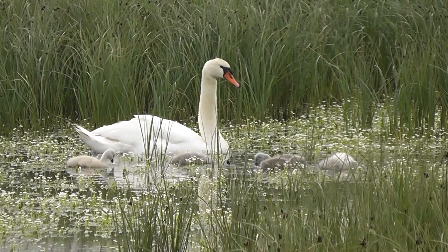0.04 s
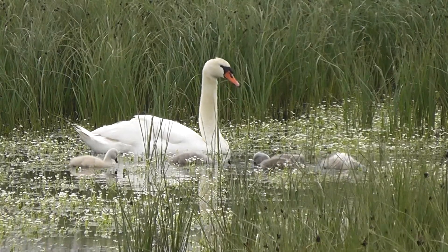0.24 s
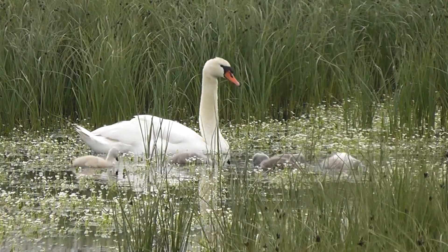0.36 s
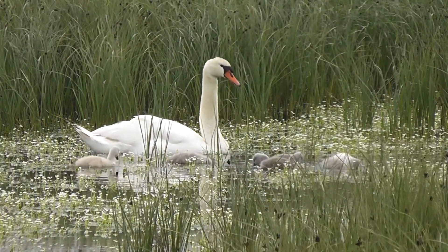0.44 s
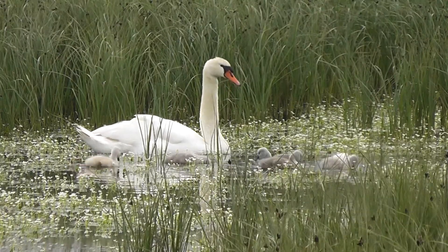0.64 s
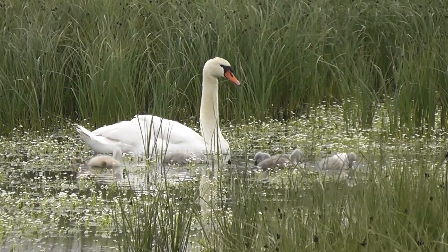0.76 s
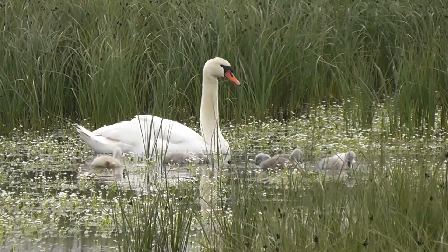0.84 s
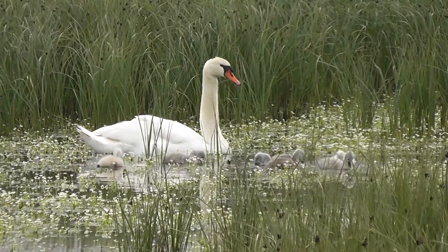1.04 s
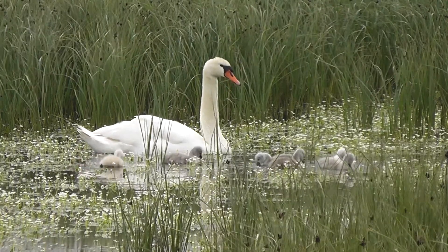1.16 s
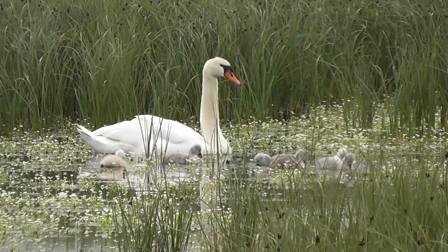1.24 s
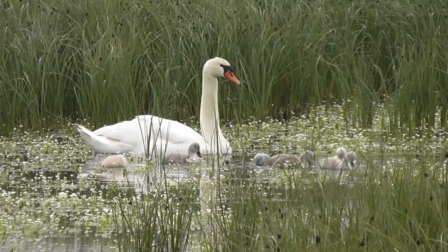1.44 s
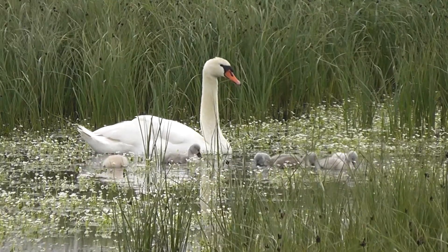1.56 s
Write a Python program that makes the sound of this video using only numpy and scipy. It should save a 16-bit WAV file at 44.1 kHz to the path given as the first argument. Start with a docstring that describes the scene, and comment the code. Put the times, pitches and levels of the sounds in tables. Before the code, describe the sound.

Waterfowl call at a reedy pond over a low, steady wind. Loud, dull microphone handling thumps come first, around 0.2 to 0.3 seconds. Three short rasping quacks follow at about 0.3, 0.45 and 0.6 seconds, with a brief clear honk at 0.5. A softer bump lands near 0.9, and a second honk at 1.3. Faint, thin hoots sound farther off, and the calls echo softly.

```python
"""A low rush of wind and a faint far hoot open the scene at a reedy pond. The camera is handled twice:
impacts excite damped thumps in its body while the grip rubs on it. One waterfowl gives three short,
rasping quacks, pulse trains filtered by the resonances of its throat; another gives two brief, clear
honks, harmonic tones that break out of a squeak. Thin hoots come from farther off, and the reedy banks
scatter every call into a soft echo."""
import sys
import numpy as np
from scipy import signal
from scipy.fft import rfft, irfft, next_fast_len
from scipy.io import wavfile
from scipy.ndimage import map_coordinates

SR = 44100
rng = np.random.default_rng(int(sys.argv[2]) if len(sys.argv) > 2 else 0)


def put_to_file(sound):
    """Save the sound as 16-bit audio at rate SR, in the file named by the first command-line argument."""
    columns = np.atleast_2d(sound).T  # one column per channel
    safe = np.clip(columns, -1, 1)
    whole_steps = np.round(safe * 32767)
    wavfile.write(sys.argv[1], SR, whole_steps.astype(np.int16))


N = 70560

# Spectra of the wind's rush and of its rumble on the microphone: frequency_hz, relative_db
WIND_SPECTRUM = [(12, -53.5), (20, -35), (49, -2), (106, -3), (153, -2), (208, -10.5), (260, -5), (334, -4),
                 (583, -5), (633, -8), (962, -8.5), (1110, -12), (1550, -16.5), (1780, -19.5), (2700, -32),
                 (4580, -31), (15600, -43.5)]
RUMBLE_SPECTRUM = [(25, -17), (55, -4), (85, -0.5), (140, -8.5), (220, -20.5), (600, -74)]
# Envelopes of the rush and the rumble: time_s, level_db
WIND_ENVELOPE = [(0, -50.5), (.45, -50.5), (.75, -51), (1.1, -51), (1.6, -50.5)]
RUMBLE_ENVELOPE = [(0, -63.5), (.3, -53.5), (.45, -45.5), (.7, -58.5), (1.05, -58.5), (1.6, -69.5)]
# Likeness of the rush in the two channels: frequency_hz, correlation
WIND_CORRELATION = [(70, 0.51), (150, 0.56), (250, 0.68), (550, 0.56), (800, 0.54), (1200, 0.1),
                    (1800, 0.25), (3500, 0.75), (7000, 0.91), (15000, 0.31)]
# Stereo balance of the rush: frequency_hz, left_minus_right_db
WIND_BALANCE = [(60, 10), (110, 4), (200, 1), (380, 3), (700, -0.5), (1290, -6.5), (2380, -1.5),
                (4400, -0.5), (8120, -1.0), (15000, -0.5)]
# Reverberation time of the reedy banks: frequency_hz, t60_s
ECHO_DECAY = [(300, 0.47), (1500, 0.37), (2050, 0.88), (2600, 0.44), (5000, 0.62), (10000, 0.32)]
# Colour of their echo: frequency_hz, gain_db
ECHO_COLOUR = [(300, -5), (800, 0), (1550, -8.5), (2070, 4), (2400, -1), (2800, 3.5), (4700, -0.5),
               (9000, -13)]
# Phase lead of airborne sound at the right microphone port: frequency_hz, lead_rad
RIGHT_PORT_LEAD = [(60, 0.21), (150, 0.44), (260, 1.1), (370, 0.43), (800, 0.71), (1200, 0.95),
                   (1800, 0.83), (3500, 0.061)]

# Impacts on the camera body: peak_s, peak_db, pitch_hz, rise_s, decay_s, left_lag_s
BODY_BUMPS = [(0.186, -38.5, 109, 0.009, 0.0044, 0), (0.2226, -16.5, 112.5, .004, 0.004, -.0005),
              (0.2321, -10, 134, 0.0038, 0.0067, .0012), (0.2525, -16, 176, 0.0051, 0.0058, -.0008),
              (0.264, -18, 227, 0.0083, 0.0074, -.0008), (0.266, -38.5, 476, 0.0042, .01, 0),
              (0.2719, -13, 123.7, 0.005, 0.0089, -.0011), (0.314, -21, 96, 0.0019, 0.0089, .0005),
              (0.289, -30, 130, 0.0074, .005, 0), (0.322, -46, 318, .01, 0.0076, 0),
              (0.336, -35, 72, 0.0067, .007, 0), (0.374, -38, 97.4, 0.0021, 0.01, 0),
              (0.424, -45, 88, 0.009, 0.012, 0), (0.834, -38, 73.6, 0.001, 0.039, 0),
              (0.874, -36, 97, 0.0058, 0.01, -.0005), (0.889, -25.5, 121.5, 0.0049, 0.0036, -.0013),
              (1.1, -49.5, 131, 0.014, 0.018, 0)]
# Friction of the grip on the housing, one envelope per touch: time_s, relative_db
RUB_ENVELOPES = [
    [(0.17, -53), (0.198, -48.5), (0.222, -37.5), (0.27, -20.5), (0.292, -28), (0.36, -55.5)],
    [(0.81, -70), (0.82, -63), (0.84, -40), (0.894, -52), (0.91, -66.5), (0.92, -58.5)],
]
# Spectrum of the friction noise: frequency_hz, relative_db
RUB_SPECTRUM = [(40, -7.5), (120, 3), (260, -3.5), (350, -13), (520, -12.5), (800, -18.5), (2000, -69)]
# Its likeness in the two channels: frequency_hz, correlation
RUB_CORRELATION = [(100, -0.38), (220, 0.14), (350, -0.48), (520, -0.94)]

# Far hoots, and two brief, high, falling throat resonances at the start of the first quack (the 4140 Hz
# and 5680 Hz rows): start_s, length_s, pitch_hz, glide_hz_per_s, level_db, left_minus_right_db
THIN_TONES = [(0.084, 0.035, 1520, -1700, -49.5, 3), (0.299, 0.025, 4140, -18000, -60.5, -2),
              (0.308, 0.013, 5680, -20000, -61.5, -5), (0.704, 0.05, 507, 0, -52, 3),
              (1.133, 0.2, 1490, 6, -62, -11), (1.298, 0.039, 1420, 1000, -56.5, -19),
              (1.334, 0.058, 1470, 596, -57, -20.5), (1.384, 0.059, 1585, 802, -60, -20)]

# Honks: start_s, length_s, pitch_hz, sag_hz_per_s, break_after_s, squeak_pitch_ratio, level_db,
# squeak_db, octave_db, third_partial_db, edge_db, flutter_db, left_minus_right_db
HONK_CALLS = [(0.506, 0.056, 827, 1124, 0.00736, .92, -39, 3.5, 2, 3.5, 0.5, -2, 4.5),
              (1.2651, 0.041, 772.4, 100, 0.014, 0.934, -41, 2, -8, -2.5, -12, 3.5, 3.5)]
# Harmonics of a honk's opening squeak, full tone and rough edge: harmonic_number, relative_db
SQUEAK_HARMONICS = [(1, -14), (2, 0), (3, -19.5), (4, -20.5)]
HONK_HARMONICS = [(1, -1), (2, -1.5), (3, -15), (4, -37)]
EDGE_HARMONICS = [(6, -24), (7, -26.5), (8, -39), (10, -33.5), (11, -37), (12, -40)]

# Throat resonances before each quack's tuning ratio: open_hz, closed_hz, bandwidth_hz, gain_db
THROAT_MODES = [(720, 694, 180, -0.5), (980, 1010, 290, -6.5), (1344, 1430, 316, -5), (1820, 1983, 265, 2),
                (2020, 2180, 264, -0.5), (2890, 2890, 890, -11.5), (3780, 3800, 303, -3),
                (4997, 4700, 218, 0), (5000, 4900, 370, -14)]
# Broad colour of the throat, also before tuning: frequency_hz, gain_db
THROAT_COLOUR = [(120, -17), (330, 15), (700, 3.5), (2200, 2), (2650, -2), (3300, -4), (3900, -0.5),
                 (4200, -12), (4550, -3.5), (5100, 0), (5900, -5), (9000, 0), (15000, -12)]
# Quacks (the first two rows overlap as one): start_s, swell_s, fade_after_s, fade_db_per_s, level_db,
# slacken_after_s, tuning_ratio, closing_s, treble_db, nasal_db, jitter_share, rasp_share,
# left_minus_right_db
QUACK_CALLS = [(0.3036, 0.0067, 0.017, 693, -45.5, 0.036, 1.03, 0.045, -16.5, -0.5, .025, .35, -5),
               (0.3330, 0.002, 0.0093, 256, -46, .009, 0.985, .11, 0, 7.5, .06, 0.4, -4.5),
               (0.4634, 0.0066, 0.029, 196, -41.5, 0.021, 1.003, 0.034, 1.5, -4, 0.043, .27, -3.5),
               (0.6243, 0.015, 0.031, 320, -40.5, .025, 0.99, 0.022, 3.5, -3.5, .013, 0.2, -3.5)]


def amp(db):
    """Amplitude ratio of a level in decibels."""
    return 10 ** (np.asarray(db) / 20)


def along(points, hz):
    """Interpolation of (frequency_hz, value) points on a logarithmic frequency axis."""
    frequencies, values = np.transpose(points)
    return np.interp(np.log(hz + 1), np.log(frequencies + 1), values)


def clock():
    """Time of each sample in seconds."""
    return np.arange(N) / SR


def ramp(u):
    """Raised-cosine step from 0 to 1."""
    return np.sin(np.pi / 2 * np.clip(u, 0, 1)) ** 2


def wobble(knots_per_s):
    """Smooth random modulation: a spline through Gaussian values."""
    return map_coordinates(rng.standard_normal(int(N * knots_per_s / SR) + 4), [clock() * knots_per_s])


def panned(x, db):
    """Localisation by level difference, left minus right."""
    return x * amp(np.array([[db], [-db]]) / 2)


def filtered(x, response):
    """Linear filtering: the spectrum is multiplied by a complex frequency response."""
    size = next_fast_len(N + SR // 2)
    return irfft(rfft(x, size) * response(np.fft.rfftfreq(size, 1 / SR)), size)[..., :N]


def stereo_noise(spectrum, correlation):
    """Coloured noise of rms 1; the ratio of mid to side sets the left-right correlation."""
    def mid_side_gains(hz):
        angle = np.arccos(np.clip(along(correlation, hz), -1, 1)) / 2
        return amp(along(spectrum, hz)) * [np.cos(angle), np.sin(angle)]

    mid, side = filtered(rng.standard_normal((2, N)), mid_side_gains)
    noise = np.array([mid + side, mid - side])
    return noise / np.sqrt(np.mean(noise ** 2) + 1e-20)


def wind():
    """Turbulence: a low, nearly steady rush over the reeds and a deep rumble on the microphone."""
    rush_db = np.interp(clock(), *np.transpose(WIND_ENVELOPE)) + 0.5 * wobble(12.5)
    rush = stereo_noise(WIND_SPECTRUM, WIND_CORRELATION)
    rush = filtered(rush, lambda hz: amp(np.array([[1], [-1]]) / 2 * along(WIND_BALANCE, hz)))
    rumble_db = np.interp(clock(), *np.transpose(RUMBLE_ENVELOPE))
    rumble = stereo_noise(RUMBLE_SPECTRUM, correlation=[(100, 0.49)])
    return amp(rush_db) * rush + amp(rumble_db) * rumble


def reed_echo(calls, gain_db=-16, stereo_spread=0.17):
    """Reverberation: the banks scatter the calls into a tail that decays exponentially in each band."""
    scatter = rng.standard_normal(SR // 2) + stereo_spread * rng.standard_normal((2, SR // 2))
    hz, t, bands = signal.stft(scatter, SR, nperseg=256)
    decay = amp(-60 * t / along(ECHO_DECAY, hz)[:, None])
    tail = signal.istft(bands * decay, SR, nperseg=256)[1]
    echo = signal.fftconvolve(calls, tail / np.linalg.norm(tail[0]), axes=1)[:, :N]
    return amp(gain_db) * filtered(echo, lambda f: amp(along(ECHO_COLOUR, f)))


def handling(rub_gain_db=-1.5):
    """Structure-borne sound: bumps excite damped oscillations of the body; the grip adds friction noise."""
    thumps, t = np.zeros((2, N)), clock()
    for peak_s, peak_db, pitch_hz, rise_s, decay_s, left_lag_s in BODY_BUMPS:
        age = t - peak_s - np.array([[left_lag_s], [-left_lag_s]]) / 2
        envelope = np.exp(-(np.minimum(age, 0) / rise_s) ** 2 - np.maximum(age, 0) / decay_s)
        thumps += amp(peak_db) * envelope * np.cos(2 * np.pi * pitch_hz * age)
    grip = sum(amp(np.interp(t, *np.transpose(touch), left=-120, right=-120)) for touch in RUB_ENVELOPES)
    return thumps + amp(rub_gain_db) * grip * stereo_noise(RUB_SPECTRUM, RUB_CORRELATION)


def thin_tones(waver_share=0.026):
    """Frequency modulation: far hoots and two high resonances of the first quack glide and waver."""
    out, t = np.zeros((2, N)), clock()
    for start_s, length_s, pitch_hz, glide_hz_per_s, level_db, pan_db in THIN_TONES:
        age = np.clip(t - start_s, 0, length_s)
        hz = (pitch_hz + glide_hz_per_s * age) * (1 + waver_share * wobble(400))
        phase = 2 * np.pi * np.cumsum(hz) / SR
        envelope = amp(level_db) * np.sin(np.pi * age / length_s)
        out += panned(envelope * np.sin(phase), pan_db)
    return out


def honks(attack_s=0.01, release_s=0.026, waver_share=0.0029, dulling=0.37, edge_fade_db_per_s=444):
    """Register break: a squeak on the octave jumps to a full, sagging harmonic tone, briefly rough."""
    out, t = np.zeros((2, N)), clock()
    for (start_s, length_s, pitch_hz, sag_hz_per_s, break_after_s, squeak_ratio, level_db,
         squeak_db, octave_db, third_db, edge_db, flutter_db, pan_db) in HONK_CALLS:
        age = np.clip(t - start_s, 0, length_s)
        since_break = age - break_after_s
        full = ramp(since_break / 0.003 + 0.5)  # 0 in the squeak, 1 in the full tone
        hz = (pitch_hz - sag_hz_per_s * since_break) * full + pitch_hz * squeak_ratio * (1 - full)
        phase = 2 * np.pi * np.cumsum(hz * (1 + waver_share * wobble(400))) / SR
        release = np.sqrt(ramp((length_s - age) / release_s))
        envelope = np.sqrt(2) * amp(level_db) * ramp(age / attack_s) * release
        for k, db in HONK_HARMONICS:
            partial_db = db + octave_db * (k == 2) + third_db * (k == 3)
            partial_db += flutter_db * np.log(k) * wobble(400)
            damping = release ** (dulling * (k - 1))  # higher partials die sooner
            partial = amp(partial_db) * damping * np.sin(k * phase)
            out += panned(envelope * full * partial, pan_db - 3.5 * (min(k, 3) - 2))
        # Random phase modulation roughens the high harmonics.
        edge = sum(amp(db + edge_db) * np.sin(k * (phase + 0.04 * wobble(700)))
                   for k, db in EDGE_HARMONICS)
        edge_fade = amp(-edge_fade_db_per_s * np.maximum(since_break - attack_s, 0))
        out += envelope * full * edge * edge_fade
        squeak = sum(amp(db + squeak_db) * np.sin(k * phase) for k, db in SQUEAK_HARMONICS)
        out += panned(envelope * (1 - full) * squeak, pan_db - 3)
    return out


def throat_ring(closure, tuning, treble_db, nasal_db, nasal_hz=1510, nasal_width_hz=330, size=2048):
    """Formant resonance: the throat's impulse response, between its open (0) and closed (1) shapes."""
    f = np.fft.rfftfreq(size, 1 / SR) / tuning
    modes = 0
    for k, (open_hz, closed_hz, bandwidth_hz, gain_db) in enumerate(THROAT_MODES):
        centre_hz = open_hz + closure * (closed_hz - open_hz)
        loss = 1j * f * bandwidth_hz
        modes += (-1) ** k * amp(gain_db) * loss / (centre_hz ** 2 - f ** 2 + loss)
    nasal_band = np.exp(-((f - nasal_hz) / nasal_width_hz) ** 2)
    colour_db = along(THROAT_COLOUR, f) + treble_db * ramp(f / 3000) + nasal_db * nasal_band
    # The causal half of the cepstrum gives a minimum-phase ring.
    cepstrum = irfft(np.log(np.abs(modes) * amp(colour_db) + 1e-4))
    ring = irfft(np.exp(rfft(2 * cepstrum[:size // 2], size)))
    return ring / np.linalg.norm(ring)


def quacks():
    """Source and filter: sharp pulses slow to a creak and ring a throat whose formants slide as it closes."""
    tight_hz, slack_hz, slowest_hz, droop_hz_per_s = 367.6, 234.8, 211.5, 500
    slacken_s, length_s, release_s = 0.004, 0.078, 0.015
    shimmer_db, onset_share = 1.64, 0.29
    out, t = np.zeros((2, N)), clock()
    for (start_s, swell_s, fade_after_s, fade_db_per_s, level_db, slacken_after_s, tuning, closing_s,
         treble_db, nasal_db, jitter_share, rasp_share, pan_db) in QUACK_CALLS:
        age = t - start_s
        tension = (1 - np.tanh((age - slacken_after_s) / slacken_s)) / 2
        rate_hz = slack_hz + (tight_hz - slack_hz) * tension - droop_hz_per_s * age
        rate_hz = np.maximum(rate_hz, slowest_hz) * (1 + jitter_share * wobble(300))
        cycles = np.cumsum(rate_hz * (age > 0)) / SR
        pulses = np.diff(np.ceil(cycles), prepend=0) * np.sqrt(SR / tight_hz)  # one per cycle
        pulses *= amp(shimmer_db * wobble(300))
        rasp = 2 * rng.standard_normal(N) * np.exp(-2 * (cycles % 1)) * (age > 0)  # hiss after each pulse
        swell = onset_share + (1 - onset_share) * ramp(age / swell_s)
        level = amp(level_db - fade_db_per_s * np.maximum(age - fade_after_s, 0))
        release = ramp((length_s - age) / release_s)
        source = (pulses + rasp_share * rasp) * swell * level * release
        closure = np.clip(age / closing_s, 0, 1)
        for shape in (0, 0.5, 1):  # crossfade through three throat shapes
            share = np.maximum(1 - 2 * np.abs(closure - shape), 0)
            ring = throat_ring(shape, tuning, treble_db, nasal_db)
            out += panned(signal.oaconvolve(source * share, ring)[:N], pan_db)
    return out


def scene():
    """Superposition: airborne sound reaches the right port first; handling comes through the body."""
    birds = quacks() + honks() + thin_tones()
    airborne = birds + reed_echo(birds) + wind()
    half_lead = np.array([[-1j], [1j]]) / 2
    at_ports = filtered(airborne, lambda hz: np.exp(half_lead * along(RIGHT_PORT_LEAD, hz)))
    return at_ports + handling()


def record(dry, low_cut_hz=58.4, top_hz=15730):
    """Band limiting: the camera thins the deep bass and passes nothing above its upper limit."""
    return filtered(dry, lambda hz: hz ** 2 / np.hypot(hz ** 2, low_cut_hz ** 2) * (hz < top_hz))


dry = scene()
out = record(dry)
put_to_file(out)
```